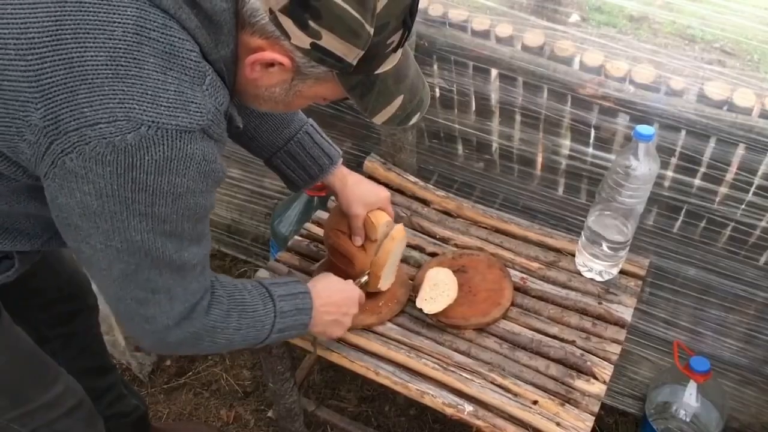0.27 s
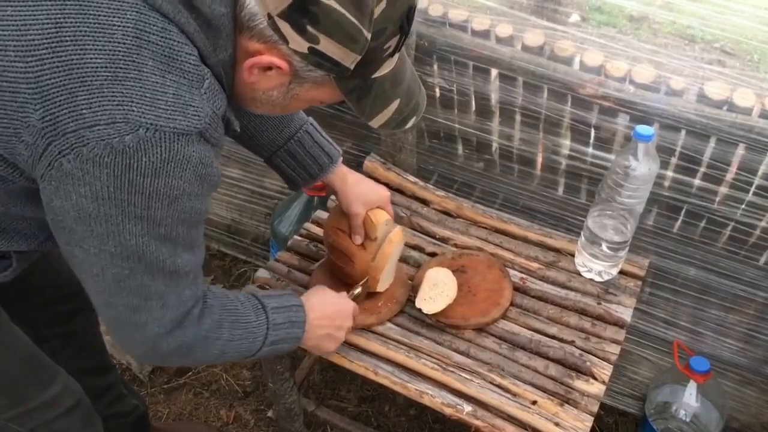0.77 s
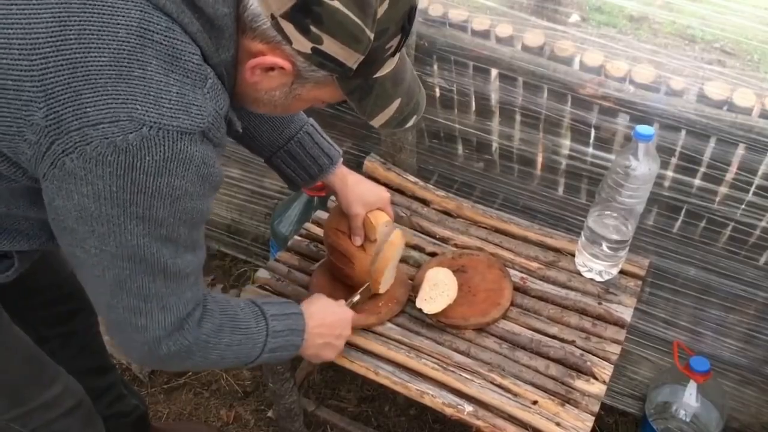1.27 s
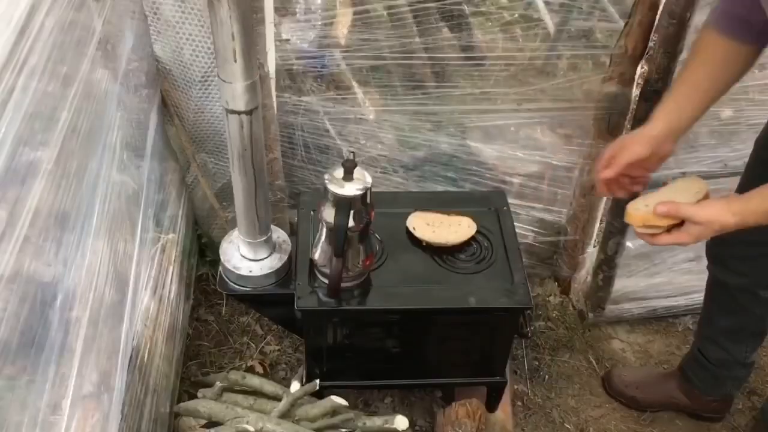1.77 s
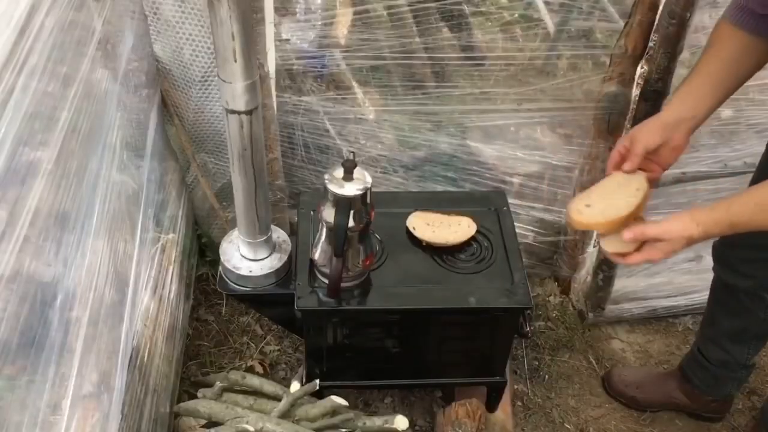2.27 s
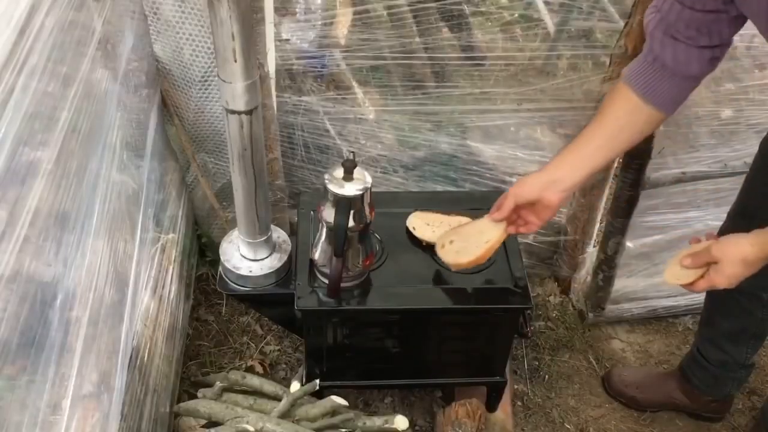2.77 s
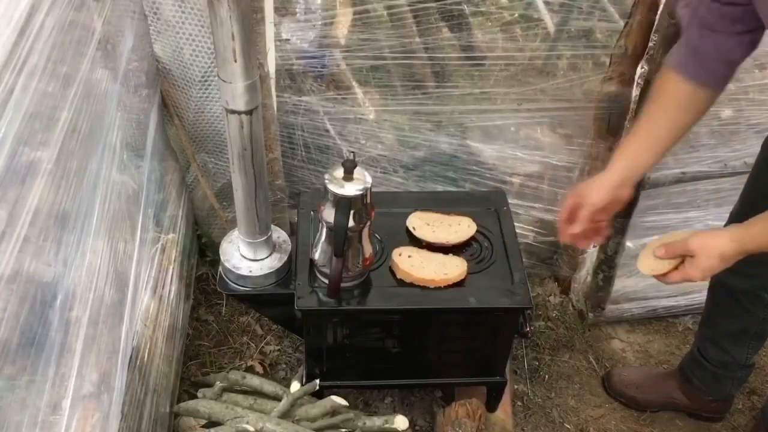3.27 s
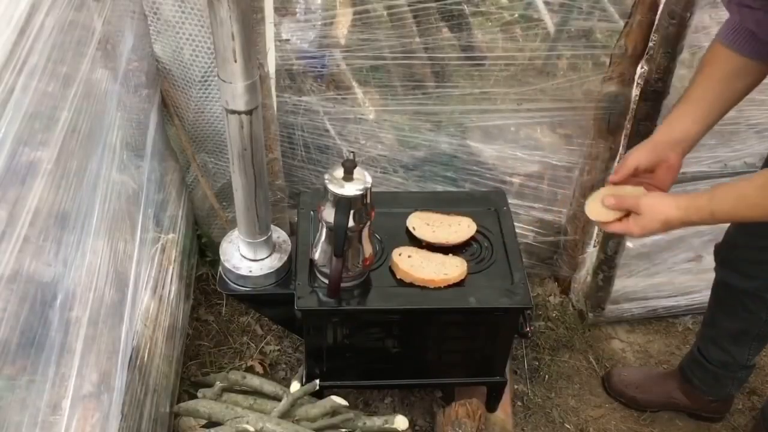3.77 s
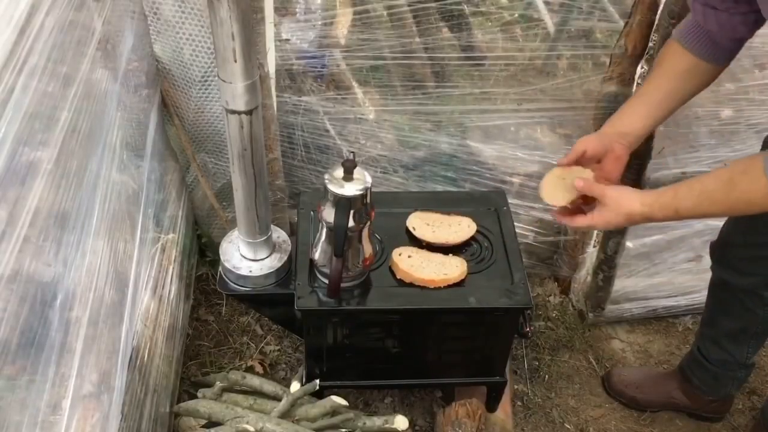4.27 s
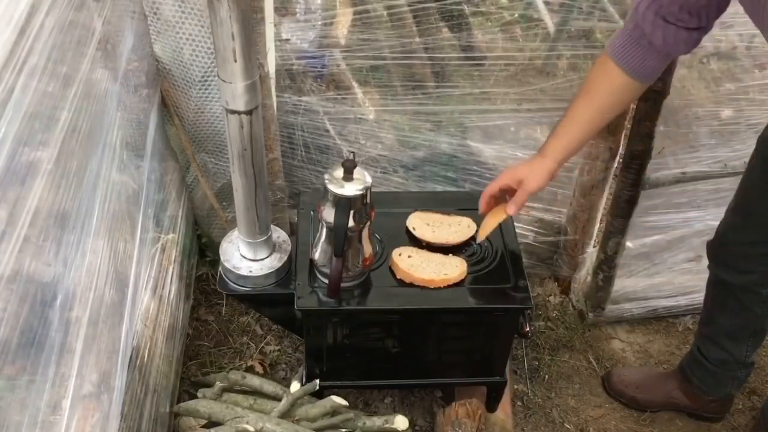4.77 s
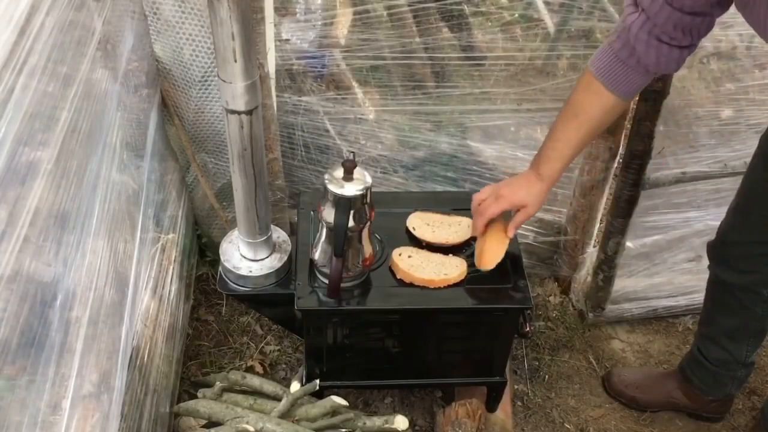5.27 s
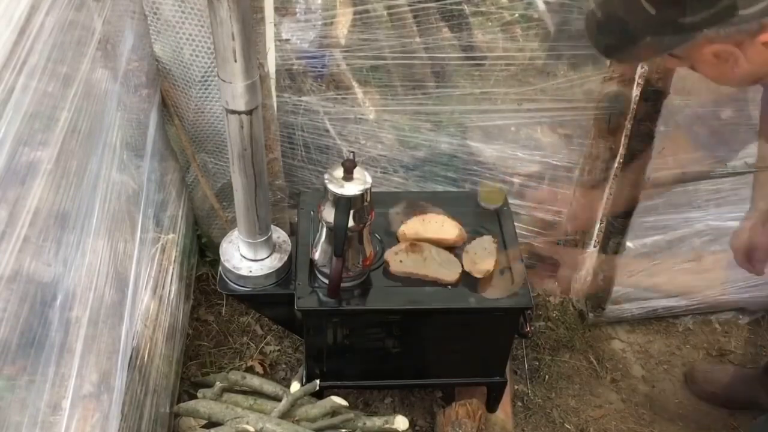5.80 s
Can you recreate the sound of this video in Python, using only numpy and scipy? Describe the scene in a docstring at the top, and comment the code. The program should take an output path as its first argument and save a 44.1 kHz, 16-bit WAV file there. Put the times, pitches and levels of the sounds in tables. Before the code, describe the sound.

In a quiet outdoor shelter, faint knife strokes rasp and crackle through bread crust on a board while a far bird whistles. The sound switches to a nearby steel wood stove, with a fluttering fire rumble, small snaps and a sizzle that swells and fades. Two loud, hollow metal clunks come a couple of seconds apart as slices land on top. Near the end the sizzle stops and the fire continues more softly.

```python
"""A shelter of plastic film, outdoors. A knife saws through a crusty loaf on a wooden board; a far bird
whistles. Then a small sheet-steel wood stove: the fire rumbles and snaps, moisture sizzles on the hot
top, and the steel clunks twice as slices of bread are set down. The level dips briefly as the stove
comes in, and again near the end, where the sizzle stops and the fire goes on more quietly."""
import sys
import numpy as np
from scipy import signal
from scipy.fft import rfft, irfft, next_fast_len
from scipy.io import wavfile

SR = 44100
rng = np.random.default_rng(int(sys.argv[2]) if len(sys.argv) > 2 else 0)


def to_wav(sig):
    """Store sig (one row per channel, or 1-D mono) as 16-bit WAV at the path in sys.argv[1].

    Samples outside -1..1 are clipped; the rate is SR.
    """
    pcm = np.clip(np.atleast_2d(sig), -1, 1) * 32767
    pcm = np.round(pcm).astype(np.int16)
    wavfile.write(sys.argv[1], SR, pcm.T)  # frames by channels


N = 266143
TIME_S = np.arange(N) / SR
STOVE_START_S, STOVE_END_S = 1.462, 5.601
STOVE_NEAR = (TIME_S > STOVE_START_S) & (TIME_S < STOVE_END_S)
BAND_LIMIT_HZ = 10050


def gain(db):
    """dB to amplitude."""
    return 10 ** (np.asarray(db) / 20)


def unit_rms(x):
    """Scales to rms 1."""
    return x / np.sqrt(np.mean(x ** 2) + 1e-20)


def curve_at(points, hz):
    """Interpolates over log frequency."""
    point_hz, value = np.transpose(points)
    return np.interp(np.log(hz + 1), np.log(point_hz + 1), value)


def add(mix, start_s, sound):
    """Mixes a sound in at start_s."""
    part = mix[round(start_s * SR):][:len(sound)]
    part += sound[:len(part)]


def coloured(x, colour_db):
    """Filters by a function from Hz to dB; rms 1."""
    size = next_fast_len(len(x))
    response = gain(colour_db(np.fft.rfftfreq(size, 1 / SR)))
    return unit_rms(irfft(rfft(x, size) * response, size)[:len(x)])


def hump(hz, centre_hz, skirt_db):
    """Broad peak in dB, skirt_db down one octave off centre."""
    octaves = np.log2((hz + 1) / centre_hz)
    return -skirt_db * (np.sqrt(1 + 4 * octaves ** 2) - 1) / (np.sqrt(5) - 1)


def wander(per_s):
    """Random drift through per_s Gaussian points a second."""
    return np.interp(TIME_S * per_s, np.arange(2048), rng.standard_normal(2048))


def pops(per_s, spread_db):
    """Random clicks of uneven size; rms 1."""
    size = gain(spread_db * np.minimum(rng.exponential(1, N), 4.5))
    return unit_rms(size * rng.standard_normal(N) * (rng.random(N) < per_s / SR))


def bursts(rows, grain, rise_s, ripple_db):
    """Noise bursts, each with its own resonances; grain roughens them into runs of tiny fractures."""
    out, t = np.zeros(N), np.arange(SR // 4) / SR
    ripple_hz = np.linspace(0, BAND_LIMIT_HZ, 45)
    for start_s, db, centre_hz, decay_s, skirt_db in rows:
        resonance_db = ripple_db * rng.uniform(-0.58, 1, len(ripple_hz))
        noise = coloured(rng.standard_normal(len(t)),
                         lambda hz: hump(hz, centre_hz, skirt_db) + np.interp(hz, ripple_hz, resonance_db))
        fractures = rng.uniform(.3, 1, len(t)) * (rng.random(len(t)) < 220 / SR)
        fractures[0] = 1
        ticks = np.sqrt(signal.lfilter([1], [1, -np.exp(-1 / (.0012 * SR))], fractures ** 2))
        roughness = 1 - grain + 2 * grain * ticks
        envelope = (1 - np.exp(-t / rise_s)) * np.exp(-t / decay_s)
        add(out, start_s, gain(db) * envelope / envelope.max() * roughness * noise)
    return out


def shelter_echo(x, t60_s):
    """Short echo off film walls, earth and trees."""
    t = np.arange(SR // 3) / SR
    taps = rng.standard_normal(len(t)) * (rng.random(len(t)) < .05)
    taps *= (t > .004) * gain(-60 * t / t60_s)
    return signal.fftconvolve(x, taps / np.linalg.norm(taps))[:N]


# Outdoor spectrum: f/Hz, level/dB
AIR_SPECTRUM = [(20, -18), (50, 5.5), (110, 1.5), (200, 0), (300, -5.5), (500, -13.5), (1000, -14.5),
                (3400, -17), (4500, -20.5), (6000, -17), (7500, -21), (9300, -19.5), (10000, -79)]

def air():
    """Faint outdoor wash with tiny rustles of film and clothes."""
    wash = coloured(rng.standard_normal(N), lambda hz: curve_at(AIR_SPECTRUM, hz))
    wash *= gain(-62.5 + 0.38 * wander(26))
    rustle = coloured(pops(per_s=500, spread_db=3), lambda hz: hump(hz, centre_hz=3000, skirt_db=4))
    return wash + rustle * gain(-78.5 + 2 * np.tanh(wander(21)))


def sawing(strokes_per_s=4.59, first_stroke_s=0.11, level_db=-73, swing_db=5):
    """Teeth tear the crumb: a fine rasp that swells with each stroke."""
    stroke = np.cos(2 * np.pi * strokes_per_s * (TIME_S - first_stroke_s))
    rasp = coloured(pops(per_s=2200, spread_db=-0.5), lambda hz: hump(hz, centre_hz=4000, skirt_db=4.5))
    return rasp * gain(level_db + swing_db * stroke) * (TIME_S < STOVE_START_S)


# Crust cracks: t/s, level/dB, centre f/Hz, decay/s, skirt/dB
CRUST_CRACKS = [(.118, -53.5, 2740, 0.014, 7), (.229, -58, 3520, 0.014, 9), (.459, -57, 5440, .025, 13),
                (.512, -57.5, 2280, 0.029, 7), (.549, -50, 5500, 0.017, -0.5), (.679, -57, 5900, 0.028, 32),
                (.745, -62, 6000, 0.04, 2), (.811, -53.5, 3800, .022, 7.5),
                (1.0665, -54.5, 3280, 0.0099, 6.5), (1.342, -62.5, 6500, 0.02, 14),
                (1.4355, -51, 5230, 0.002, 7)]

def crust():
    """Crust fractures under the knife."""
    return bursts(CRUST_CRACKS, grain=.38, rise_s=.0007, ripple_db=6)


# Board bumps: t/s, level/dB, centre f/Hz, decay/s
BOARD_BUMPS = [(.314, -58.5, 230, 0.018), (0.498, -67, 400, 0.07), (0.702, -58, 380, 0.024),
               (0.994, -63, 255, .02), (1.133, -56.5, 218, 0.026), (1.397, -53.5, 398, 0.0091)]

def bumps(skirt_db=6.5):
    """Loaf and board bump on the table."""
    return bursts([(*row, skirt_db) for row in BOARD_BUMPS], grain=0, rise_s=.003, ripple_db=3)


# Whistles: t/s, start f/Hz, level/dB
BIRD_WHISTLES = [(.35, 3440, -73), (.83, 2680, -72), (1.24, 2800, -68.5)]

def bird(length_s=.15, fall_ratio=.11):
    """Thin, far, falling whistles, blurred by the trees."""
    out = np.zeros(N)
    for start_s, start_hz, db in BIRD_WHISTLES:
        hz = start_hz * np.linspace(1, 1 - fall_ratio, round(length_s * SR))
        add(out, start_s, gain(db) * np.sin(2 * np.pi * np.cumsum(hz) / SR) * np.hanning(len(hz)))
    return shelter_echo(out * (1 + .7 * wander(250)), t60_s=.2)


# Steaming slices: t/s, heating/s, hold/s, fizz level/dB, spit level/dB
SLICE_STEAM = [(1.397, 0.84, 0.35, -48, -57.5), (3.085, 0.22, 0.5, -51.5, -55.5)]

def steam(fine, rest_db, dry_db_per_s, cold_db=-13):
    """Fizz (fine) or spit envelope: slices heat, hold and dry; powers add over a resting level."""
    power = np.full(N, gain(rest_db) ** 2)
    for start_s, heating_s, hold_s, fizz_db, spit_db in SLICE_STEAM:
        full_db = fizz_db if fine else spit_db
        coldness = np.maximum(1 - (TIME_S - start_s) / heating_s, 0)
        drying_s = np.maximum(TIME_S - start_s - heating_s - hold_s, 0)
        power += gain(full_db + cold_db * coldness - dry_db_per_s * drying_s) ** 2
    return np.sqrt(power)


# Hiss spectrum: f/Hz, level/dB
HISS_SPECTRUM = [(300, -19.5), (700, -16), (1000, -7.5), (1300, -8.5), (1700, 0.5), (2900, 3), (3500, 1),
                 (3850, -4), (4800, -5.5), (5300, 0), (6400, -2.5), (7300, -6), (9300, -6), (10000, -16.5)]
# Hiss resonances: f/Hz, width/Hz, level/dB
HISS_RESONANCES = [(936, 82, 11.5), (2380, 70, 3.5), (2772, 63, 3.5), (3410, 200, 4.5), (4480, 210, 5.5),
                   (5090, 16, 8.5), (5560, 170, 0.5), (5850, 180, 8), (5960, 35, -9), (6790, 84, 8),
                   (7780, 97, 9), (8230, 320, 7.5), (9140, 200, 5)]

def hiss(fine, pops_per_s, split_hz=4000):
    """Tiny steam bursts merge into a resonant hiss, above split_hz if fine, else below."""
    def colour_db(hz):
        peaks_db = sum(db / (1 + (2 * (hz - peak_hz) / width_hz) ** 2)
                       for peak_hz, width_hz, db in HISS_RESONANCES)
        slope = ((hz + 1) / split_hz) ** 8
        crossover_db = -10 * np.log10(1 + (1 / slope if fine else slope))
        return curve_at(HISS_SPECTRUM, hz) + peaks_db + crossover_db
    return coloured(rng.standard_normal(N) + 0.65 * pops(pops_per_s, spread_db=3), colour_db)


def near_reflections(x, t60_s, wet_db):
    """Adds quick reflections off nearby steel and film."""
    t = np.arange(SR // 16) / SR
    taps = rng.standard_normal(len(t)) * (t > .0015) * gain(-60 * t / t60_s)
    wet = signal.fftconvolve(x, taps / np.linalg.norm(taps))[:N]
    return (x + gain(wet_db) * wet) / np.sqrt(1 + gain(wet_db) ** 2)


def sizzle():
    """Moisture boils on the hot top; fine fizz dies before coarse spitting."""
    fizz = hiss(fine=True, pops_per_s=3000) * steam(fine=True, rest_db=-64.5, dry_db_per_s=9.5)
    spit = hiss(fine=False, pops_per_s=900) * steam(fine=False, rest_db=-66.5, dry_db_per_s=7.5)
    sputter = gain(0.38 * wander(35))
    return near_reflections((fizz + spit) * sputter, t60_s=.045, wet_db=-8) * STOVE_NEAR


# Flame spectrum: f/Hz, level/dB
FIRE_SPECTRUM = [(20, -42.5), (45, -7), (70, 1), (110, -0.5), (165, -2.5), (210, -2), (250, -16.5),
                 (400, -19), (700, -22), (1500, -23.5), (5000, -41.5)]

def fire(start_db=-58.5, draught_db_per_s=1.29, end_db=-60.5, flutter_db=4, flutter_below_hz=260):
    """Flames grow with the draught: a fluttering deep roar under a steady rush."""
    roar = coloured(rng.standard_normal(N), lambda hz: curve_at(FIRE_SPECTRUM, hz))
    deep = signal.sosfiltfilt(signal.butter(2, flutter_below_hz, fs=SR, output="sos"), roar)
    flames = deep * gain(flutter_db * np.tanh(wander(25))) + (roar - deep)
    near_gain = gain(start_db + draught_db_per_s * (TIME_S - STOVE_START_S)) * STOVE_NEAR
    return flames * (near_gain + gain(end_db) * (TIME_S > STOVE_END_S))


# Flare-ups: t/s, level/dB, f/Hz
FLAME_PUFFS = [(1.648, -47.5, 123), (1.852, -44, 184), (1.954, -44, 144), (2.107, -43.5, 171),
               (2.781, -40.5, 167), (2.99, -44, 112), (4.209, -45, 113), (4.312, -43, 125), (5.31, -40, 97),
               (5.34, -43.5, 112)]

def puffs():
    """The biggest flames flare with a swing or two of air."""
    out, t = np.zeros(N), np.arange(-SR // 32, SR // 32) / SR
    for peak_s, db, hz in FLAME_PUFFS:
        swing = np.sin(2 * np.pi * (hz * t + rng.random()))
        add(out, peak_s + t[0], gain(db) * swing * np.exp(-(t * hz / 0.93) ** 2))
    return out


# Snaps: t/s, level/dB, centre f/Hz, decay/s
STOVE_SNAPS = [(2.571, -49.5, 626, 0.011), (3.881, -45.5, 3000, 0.0043), (4.0493, -41.5, 2510, 0.0047),
               (4.437, -49, 3040, 0.016), (4.505, -50.5, 1690, 0.0062), (5.063, -51.5, 2500, 0.0045),
               (5.229, -52.5, 1440, 0.031), (5.508, -47.5, 2480, 0.0065), (5.5523, -47.5, 4350, 0.0066),
               (5.663, -54, 7400, 0.01), (5.793, -56, 2100, 0.026)]

def snaps(skirt_db=7):
    """Burning wood snaps, drops spit, crust scrapes on steel."""
    return bursts([(*row, skirt_db) for row in STOVE_SNAPS], grain=.3, rise_s=.0003, ripple_db=5)


def buckle(t, hz=220, width_s=0.0041, rise_s=0.00026):
    """The hot sheet snaps through: one short swing of air."""
    from_peak_s = t - 1 / hz
    envelope = np.exp(-(from_peak_s / width_s) ** 2) * (1 - np.exp(-t / rise_s))
    return np.cos(2 * np.pi * hz * from_peak_s) * envelope


# Box bending modes: f/Hz, level/dB, t60/s
BOX_MODES = [(128, -17, 0.077), (166, -5.5, 0.13), (216.8, -4, 0.17), (262, -31, 0.017), (322, -4.5, 0.21),
             (362.3, -9.5, 0.15), (424, -17, 0.15)]

def box_boom(t, rise_s=0.017):
    """The steel box flexes in slow modes."""
    modes = sum(gain(db - 60 * t / t60_s) * np.cos(2 * np.pi * hz * t) for hz, db, t60_s in BOX_MODES)
    return modes * (1 - np.exp(-(t / rise_s) ** 2))


# Plate modes: f/Hz, relative level/dB, t60/s
PLATE_MODES = [(535, -1, .22), (581, -1, .19), (785, -6, .2), (940, -6, .2), (1037, .5, .26),
               (1150, -1, .27), (1576, -3, .19), (1825, -6, .2), (1990, -3, .2), (2138, -4, .19),
               (2692, -4, .2), (3203, 0, .18), (3620, -3, .14), (4124, -5, .12), (4194, -2, .16),
               (6550, -6, .12)]

def plate_ring(t):
    """Decaying plate modes; neighbours start in antiphase."""
    return sum((-1) ** k * gain(db - 60 * t / t60_s) * np.sin(2 * np.pi * hz * t)
               for k, (hz, db, t60_s) in enumerate(PLATE_MODES)) / 2


# Clatter spectrum: f/Hz, level/dB
CLATTER_SPECTRUM = [(80, -31), (200, -4), (400, -2), (650, -6.5), (1100, -3), (2000, -0.5), (3000, 0),
                    (4300, -1.5), (6000, 0), (8000, -3), (10000, -11)]
# Clatter decay: f/Hz, t60/s
CLATTER_DECAY = [(200, 0.23), (1100, 0.28), (2500, 0.15), (5000, 0.12), (9000, 0.11)]

def clatter(t, tilt_db_per_oct):
    """Plate, lid and kettle rattle in dense modes; the high ones die first."""
    def colour_db(hz):
        return curve_at(CLATTER_SPECTRUM, hz) + tilt_db_per_oct * np.log2(np.clip(hz, 100, BAND_LIMIT_HZ))
    noise = coloured(rng.standard_normal(len(t)), colour_db)
    band_hz, age_s, bands = signal.stft(noise, SR, nperseg=256)
    decay = gain(-60 * age_s / curve_at(CLATTER_DECAY, band_hz)[:, None])
    return signal.istft(bands * decay, SR, nperseg=256)[1][:len(t)]


# Blows on the top: t/s, thump/dB, boom/dB, clatter/dB, ring/dB, clatter tilt/(dB/oct), metal rise/s
STOVE_KNOCKS = [(2.809, -31, -28.5, -29.5, -41.5, -4, 0.0059), (2.8383, -20.5, -28, -31, -35, -0.5, 0.0026),
                (5.134, -30.5, -31, -49.5, -69, -3.5, 0.0025),
                (5.1532, -54, -30.5, -34, -44.5, -1.5, 0.0018),
                (5.1576, -16.5, -24.5, -34, -42, -2.5, 0.0078)]

def knocks():
    """Slices land: the thin top buckles, the box booms, the metal clatters and rings."""
    out, t = np.zeros(N), np.arange(SR // 2) / SR
    thump, boom, ring = buckle(t), box_boom(t), plate_ring(t)
    for start_s, thump_db, boom_db, clatter_db, ring_db, tilt_db_per_oct, rise_s in STOVE_KNOCKS:
        metal = gain(clatter_db) * clatter(t, tilt_db_per_oct) + gain(ring_db) * ring
        metal *= 1 - np.exp(-t / rise_s)
        add(out, start_s, gain(thump_db) * thump + gain(boom_db) * boom + metal)
    return out


def scene():
    """Knife and board, then the stove, over outdoor air; mono."""
    small_sounds = crust() + bumps() + snaps() + sawing()
    echo = gain(-11.5) * shelter_echo(small_sounds, t60_s=0.17)
    return (air() + bird() + fire() + puffs() + sizzle() + knocks() + small_sounds + echo)[None]


def record(dry, fade_s=.022):
    """Two brief level dips, then a low-pass."""
    for dip_s in (STOVE_START_S, STOVE_END_S):
        dry = dry * np.clip(abs(TIME_S - dip_s) / fade_s, .1, 1) ** 1.3
    lowpass = signal.firwin(401, BAND_LIMIT_HZ, window=("kaiser", 8), fs=SR)
    return signal.oaconvolve(dry, lowpass[None], "same")


dry = scene()
out = record(dry)
to_wav(out)
```